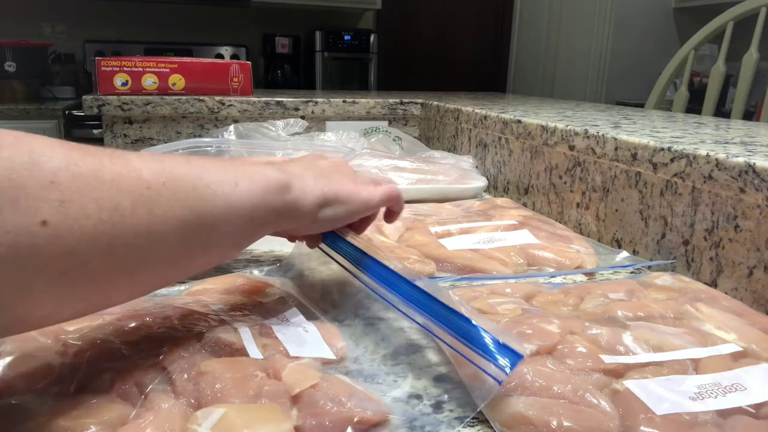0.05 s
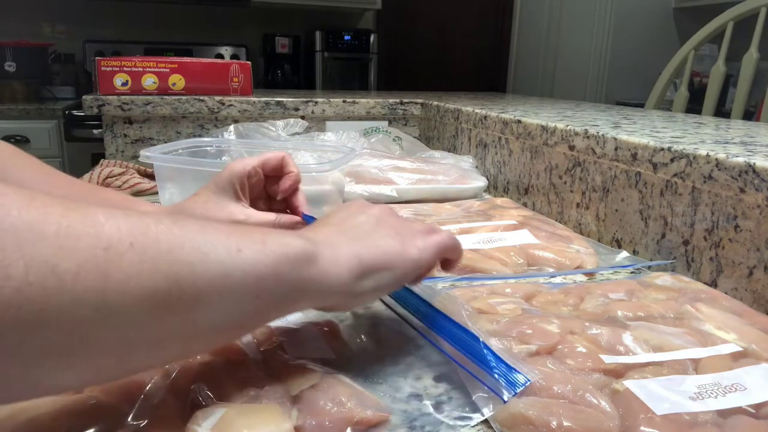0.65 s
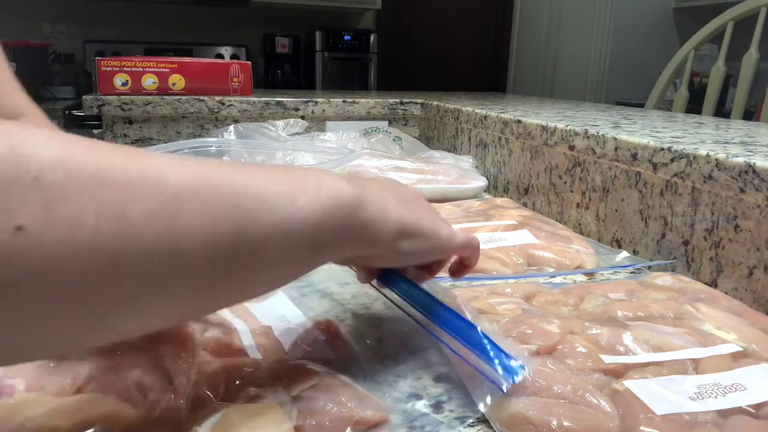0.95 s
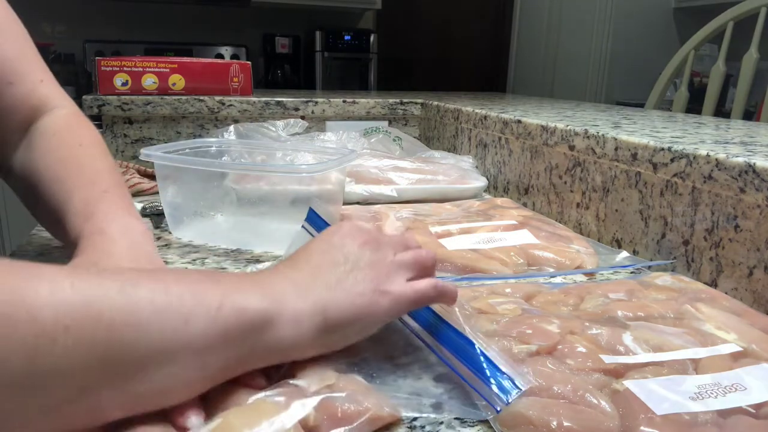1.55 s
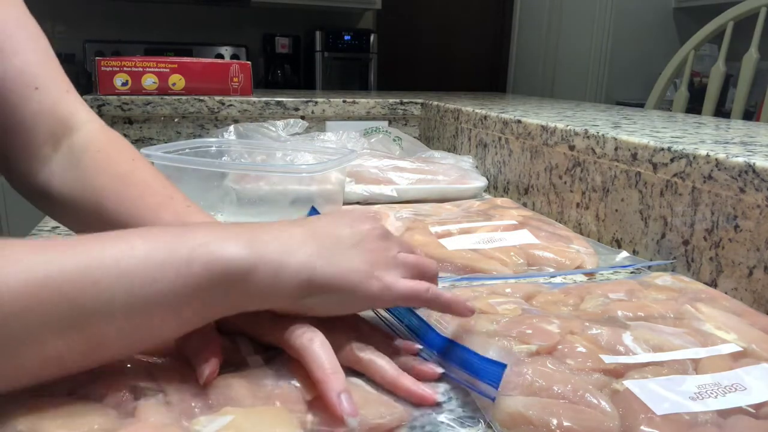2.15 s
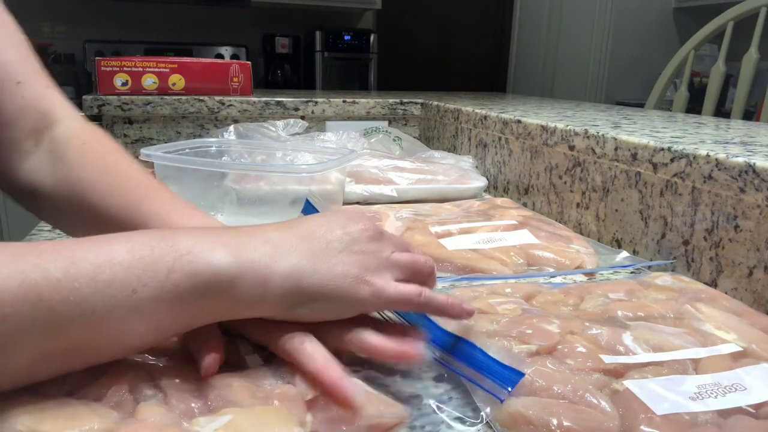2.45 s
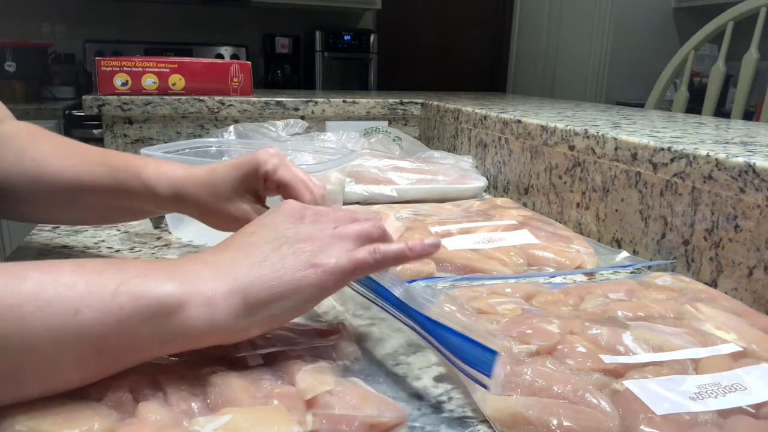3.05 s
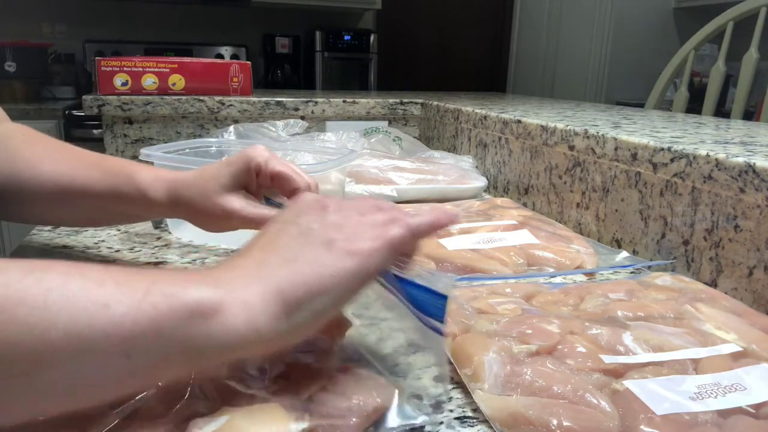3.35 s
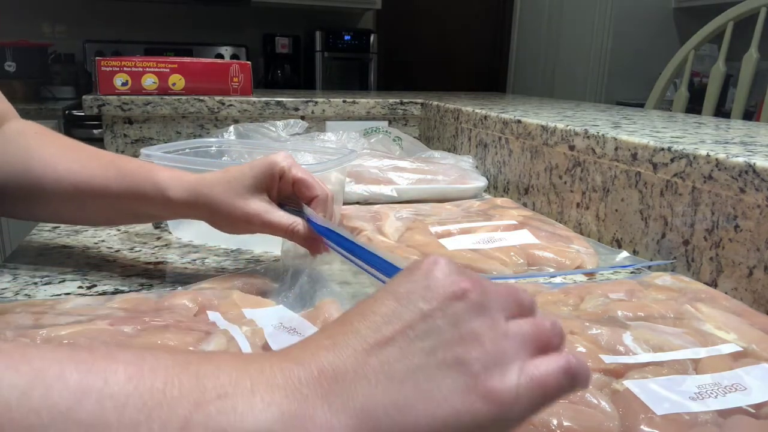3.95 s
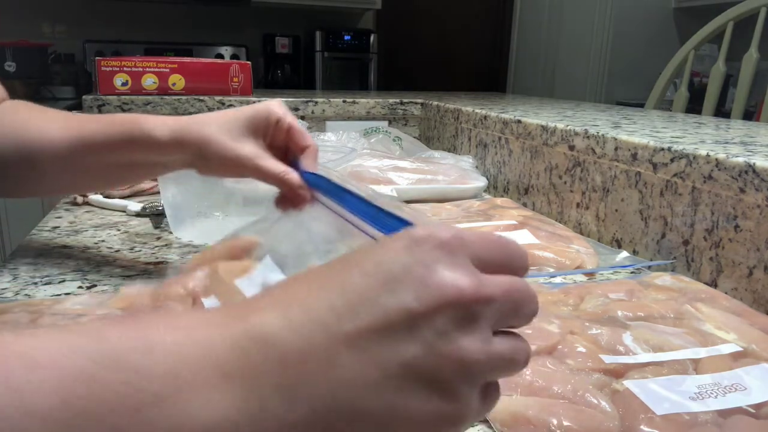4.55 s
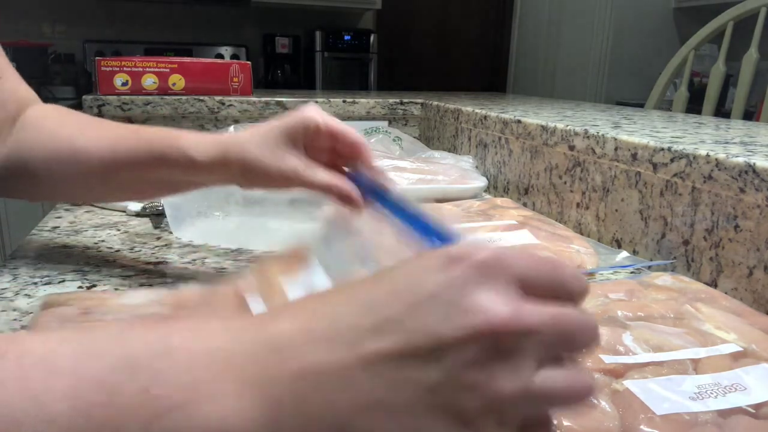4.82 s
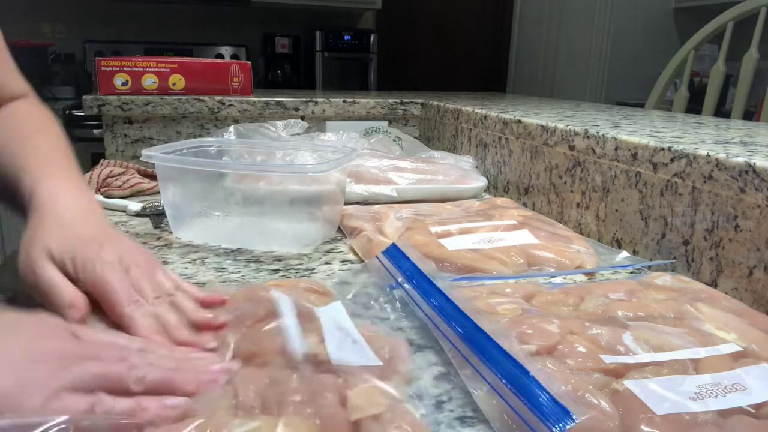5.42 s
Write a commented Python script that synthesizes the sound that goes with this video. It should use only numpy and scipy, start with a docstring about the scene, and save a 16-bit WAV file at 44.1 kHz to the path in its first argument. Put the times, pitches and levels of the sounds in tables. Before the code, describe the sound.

A plastic freezer bag of raw meat softly crinkles and crackles as it is pressed, sealed and laid down on a kitchen counter.

```python
"""Faint snaps, a fine crinkle and a hiss: a plastic freezer bag of raw chicken is pressed flat and sealed,
then lifted and laid down on a stone kitchen counter. Creases buckle and ring small patches of film,
and fingers make friction noise along the zip strip. A hand bumps an empty plastic tub, whose walls ring.
The meat shifts and flops softly, and an appliance hums in the small, reverberant room."""
import sys
import numpy as np
from scipy import signal
from scipy.fft import rfft, irfft, next_fast_len
from scipy.io import wavfile
from scipy.ndimage import uniform_filter1d, map_coordinates

SR = 44100
rng = np.random.default_rng(int(sys.argv[2]) if len(sys.argv) > 2 else 0)


def master(y):
    """Save y as 16-bit WAV."""
    cut = np.clip(np.atleast_2d(y).T, -1, 1)
    pcm = np.round(cut * 32767)  # scale
    wavfile.write(sys.argv[1], SR, pcm.astype(np.int16))


N = 250488
CREAK_S, CLICK_S = .003, .005  # creak ahead of a snap; nominal length of a click


def snaps():
    """Snap-through buckling: each large crease rings a patch of film; taut ones add a brief sharp edge."""
    # Each row: time in seconds, relative level in dB, patch pitch in Hz, relative edge strength in dB.
    creases = [(.083, -58.5, 2380, -21), (.165, -62, 1400, -24.5), (0.2672, -54.5, 4200, -19),
               (.29, -50.5, 5360, -6), (0.311, -58, 5060, -13), (0.499, -55.5, 2300, -24),
               (0.5351, -44, 3920, -5), (.6492, -60, 1990, -19), (0.754, -37.5, 2620, -16),
               (0.8938, -42.5, 1340, -33), (1.0152, -32, 3040, -9.5), (1.0232, -39, 3360, -14),
               (1.0607, -41, 2380, -9), (1.1983, -45.5, 3600, -31), (1.2221, -34.5, 1244, -7.5),
               (1.2245, -40, 3650, -24), (1.2853, -53, 3810, 2), (1.31, -49, 1487, -30),
               (1.3402, -35.5, 2670, -7.5), (1.3962, -41, 3130, -26), (1.4365, -44, 3920, -24),
               (1.4625, -42, 3325, -11), (1.4696, -41, 1977, 5), (1.4905, -39.5, 3070, -16),
               (1.5332, -48, 1960, -23), (1.5573, -49, 4020, -10), (1.597, -41, 4340, -17),
               (1.6076, -38, 6750, 4.5), (1.613, -40.5, 3765, -12), (1.6321, -42, 2240, -23),
               (1.6559, -45.5, 2300, 1), (1.7012, -43.5, 2340, -4), (1.838, -42, 1439, -27),
               (1.8649, -45.5, 1588, -20), (1.9271, -44, 2350, 2), (1.939, -41, 1270, -14),
               (1.9762, -45, 1750, -25), (1.9874, -40, 3040, -23), (2.018, -44, 3940, -8),
               (2.0311, -36.5, 1720, -8), (2.0491, -41.5, 2640, -8), (2.1387, -40, 1490, -14),
               (2.192, -45.5, 1390, -5), (2.2512, -46, 1180, -31), (2.355, -39, 3470, -18),
               (2.3692, -41.5, 3212, -21), (2.4084, -40.5, 1806, -2.5), (2.42, -45, 2283, -21),
               (2.5854, -54.5, 3120, -29), (2.6521, -48.5, 3754, -11), (2.7301, -42.5, 1832, -10),
               (2.8528, -42.5, 5240, -6), (2.8664, -39, 3900, -10), (2.873, -52, 2327, -26),
               (2.909, -46, 5960, -9), (3.068, -54, 3440, -24), (3.1473, -40.5, 5260, -1.5),
               (3.1905, -46.5, 3580, -29), (3.2487, -47.5, 2520, -19), (3.303, -47.5, 3056, -20),
               (3.3155, -48, 3830, -4), (3.327, -47, 2860, -18), (3.495, -49, 1580, -17),
               (3.615, -52, 2990, -25), (3.692, -48, 1720, -31), (3.8235, -43.5, 6960, 3),
               (3.9244, -45.5, 5650, 7.5), (3.9958, -51, 1448, -30), (4.0415, -39.5, 2617, 2.5),
               (4.1202, -46, 2380, -24), (4.1932, -46, 1436, -19), (4.2201, -44, 3810, -24),
               (4.2715, -49.5, 3000, -27), (4.336, -45.5, 1873, -20), (4.3765, -43.5, 3430, -15),
               (4.396, -42.5, 1792, -26), (4.4018, -45, 2390, -4), (4.4193, -41.5, 1905, 1),
               (4.4518, -43.5, 4300, 3.5), (4.4875, -41, 1500, -11), (4.534, -37.5, 3230, -3),
               (4.605, -47, 4364, -26), (4.6353, -45.5, 3996, -16), (4.7428, -40.5, 3240, -24),
               (4.7673, -51.5, 1709, 6), (4.8315, -45.5, 3128, -7), (4.8592, -34.5, 2980, -13),
               (4.8687, -39, 2357, -19), (4.872, -39.5, 1900, -16), (4.8834, -29, 4170, -12.5),
               (4.9716, -35, 2430, -11.5), (4.9766, -41.5, 2260, -26), (5.0988, -46, 2200, -27),
               (5.1644, -41, 1820, -30), (5.212, -42, 2500, 2), (5.2329, -39.5, 3614, -10),
               (5.2527, -36.5, 5220, -4.5), (5.2672, -37, 5650, -3), (5.297, -39, 4110, -17),
               (5.3132, -36, 2291, 0), (5.3557, -35.5, 4400, -1), (5.3987, -40, 3866, -25),
               (5.4145, -32.5, 5860, -27), (5.4297, -32, 4340, -6), (5.444, -34, 3170, -23),
               (5.469, -29, 1613, -2.5), (5.5208, -37.5, 2880, -15)]
    times, db, hz, edge_db = np.transpose(creases)
    force = buckling(len(times), crack_t60=0.0032, flutter_t60=0.019, flutter_db=1, lead_db=-23, jolt=4.1)
    patch = filtered(force, lambda f: film(f, hz[:, None], q=1.21, body_hz=1850, body_q=0.057, dull_hz=7270))
    crack = buckling(len(times), crack_t60=0.0037, flutter_t60=0.014, flutter_db=-6, lead_db=-28, jolt=1.9)
    edge = filtered(crack, lambda f: resonance(f, 10300, q=1.0) ** 2)
    clicks = levelled(patch) + amp(edge_db - 6.5)[:, None] * levelled(edge)
    return placed(times - CREAK_S, amp(db + 1.3)[:, None] * clicks)


def crinkle(level_db, pitch_hz, count=1500, spread=0.52, range_db=19, crowding=.7):
    """Crackling noise: tiny random creases give way, more densely the harder the film is worked."""
    density = amp(crowding * level_db)
    density /= density.mean()
    at = np.searchsorted(np.cumsum(density), (np.arange(count) + rng.random(count)) * (N - 1) / count)
    hz = (pitch_hz[at] * np.exp(spread * rng.standard_normal(count)))[:, None]
    force = buckling(count, crack_t60=.005, flutter_t60=.02, flutter_db=-10, lead_db=-13, jolt=3)
    ticks = filtered(force, lambda f: film(f, hz, q=1.02, body_hz=2300, body_q=0.33, dull_hz=2.08 * hz))
    # Ticks that sound together add in power, so they share the level.
    overlap = density[at] * count * CLICK_S * SR / N
    sizes = unit(amp(range_db * rng.random(count) ** 2)) * amp(level_db[at] - 3.0) / np.sqrt(overlap)
    return placed(at / SR, sizes[:, None] * levelled(ticks))


def buckling(count, crack_t60, flutter_t60, flutter_db, lead_db, jolt):
    """Elastic instability: the force of a flipping crease is a creak, a jolt and crack, then flutter."""
    t = np.arange(SR // 50) / SR - CREAK_S
    crack = (t >= 0) * amp(-60 * np.abs(t) / crack_t60)
    flutter = amp(flutter_db - 60 * np.abs(t) / flutter_t60) * np.where(t < 0, amp(lead_db), 1)
    stutter = amp(4 * unit(uniform_filter1d(rng.standard_normal((count, len(t))), size=40, axis=1)))
    force = rng.standard_normal((count, len(t))) * (crack + flutter * stutter)
    force[:, np.argmax(t >= 0) + 2] += jolt * rng.choice([-1, 1], count)
    return force


def film(f, hz, q, body_hz, body_q, dull_hz):
    """Resonators in series: a patch's own pitch on the whole bag's broad response, dulled at the top."""
    return resonance(f, hz, q) * resonance(f, body_hz, body_q) / np.sqrt(1 + (f / dull_hz) ** 8)


def handling():
    """Relaxation: film gives at once, settles slowly. The strongest grip sets levels and crease pitch."""
    # The hands press, lift or lay down the bag. Each row: start in seconds, hold in seconds,
    # relative crinkle level in dB, relative meat level in dB, typical crease pitch in Hz.
    grips = [(0.254, .36, -68, -78, 2310), (0.759, .15, -51, -60, 1840), (1.005, .02, -42, -54, 2400),
             (1.237, .02, -46, -60, 2275), (1.379, .12, -49, -57.5, 2080), (1.619, .07, -50, -62, 1930),
             (1.841, .06, -55, -58.5, 1707), (1.937, .11, -47, -59, 1839), (2.16, .09, -59, -73, 1750),
             (2.374, .09, -49, -66, 2130), (2.603, .15, -62, -70, 2100), (2.873, .02, -53, -62.5, 2308),
             (3.09, .01, -62, -59, 2510), (3.16, .11, -56, -59, 2020), (3.522, .2, -61, -67.5, 2070),
             (4.126, .09, -53, -56, 1950), (4.389, .15, -49, -54, 1997), (4.629, .16, -51, -61, 2197),
             (4.852, .03, -37, -48.5, 2280), (4.953, .08, -50, -61, 2140), (5.147, .26, -44, -58.5, 2325),
             (5.45, .025, -32, -50, 2900)]
    start, hold, crinkle_db, meat_db, hz = np.transpose(grips)
    levels = gestures(start, hold, crinkle_db, rise=649.5, sag=0, fall=170)
    strongest, film_db = levels.argmax(axis=0), levels.max(axis=0)
    shifting_db = film_db + (meat_db - crinkle_db)[strongest]
    # The floors belong to a hand that only holds the bag.
    return np.maximum(film_db, -73), np.maximum(shifting_db, -75), hz[strongest]


def slide(crinkle_db, rub_db=-13, tilt_db_per_octave=3):
    """Stick-slip friction: a finely rasping hiss, brighter for a fingertip than for film on film."""
    # Fingers run along zip strip and film. Each row: start and length in seconds, relative level in dB.
    strokes = [(0, .02, -57), (0.246, 0.395, -59), (0.765, 0.07, -56.5), (1.873, .15, -51.5),
               (2.378, .2, -55.5), (3.363, 0.52, -51), (4.05, .15, -63), (4.68, .3, -55.5),
               (5.18, .2, -50.5)]
    # Friction spectrum. Each row: frequency in Hz, relative spectral density in dB.
    hiss = [(1000, -26), (2200, -0.5), (3500, 3.5), (7500, -0.5), (9000, -7), (13000, -6.5), (16000, -13)]
    # The finger speeds up, slows and lets go.
    stroke_db = gestures(*np.transpose(strokes), rise=174, sag=22.5, fall=310).max(axis=0)
    brighter = [(hz, db + tilt_db_per_octave * np.log2(hz)) for hz, db in hiss]
    rasp = unit(amp(1.5 * wobble(58) + 2.0 * wobble(1000)))
    fingertip = amp(stroke_db) * noise(brighter)
    film_on_film = amp(crinkle_db + rub_db) * noise(hiss)
    return amp(-7.5) * rasp * (fingertip + film_on_film)


def tub(contacts=3, chatter_s=0.00452, loss_db=5.5):
    """Modal ringing: the tub's rim rebounds after a bump; each contact rings the walls at new strengths."""
    # The tub knocks on the counter. Each row: time in seconds, relative peak level in dB.
    bumps = [(.749, -24), (.774, -34), (.805, -38), (.841, -31), (.854, -29), (.895, -31), (.92, -39),
             (0.942, -37)]
    # Each row: frequency in Hz, relative level in dB, time to decay by 60 dB in seconds.
    wall_modes = [(204.7, -4, 0.092), (266, 0.5, 0.027), (331, -4.5, 0.097), (429, 5.5, 0.028),
                  (600, -4.5, 0.05), (785, -7, 0.16), (896, -4, 0.044), (1320, -8.5, 0.055)]
    t = np.arange(SR // 4) / SR
    touches = [(at + k * chatter_s, peak_db - k * loss_db) for at, peak_db in bumps for k in range(contacts)]
    times, db = np.transpose(touches)
    modes = np.array([amp(level - 60 * t / t60) * np.sin(2 * np.pi * hz * t) for hz, level, t60 in wall_modes])
    shape = (len(times), len(wall_modes))
    strengths = amp(rng.normal(0, 1.4, shape)) * rng.choice([-1, 1], shape)
    dull = lambda f: resonance(f, 275, q=0.99) * resonance(f, 395, q=0.52) * resonance(f, 843, q=0.63)
    scuff = filtered(rng.standard_normal((len(times), len(t))) * amp(-60 * t / 0.073), dull)
    rings = (strengths @ modes + amp(20.5) * scuff) * (1 - np.exp(-t / .001))
    rings = filtered(rings, lambda f: resonance(f, 400, q=.2))  # thin walls radiate little deep bass
    return placed(times, rings * amp(db - .5)[:, None] / np.abs(rings).max(axis=1, keepdims=True))


def meat(level_db):
    """Heavily damped impacts: wet meat shifts in lumps, pats the film and flops under its own weight."""
    # Each row: frequency in Hz, relative spectral density in dB.
    shifting_spectrum = [(60, -13), (140, -7.5), (210, -1.5), (450, 5.5), (800, -4.5), (1250, 3.5),
                         (2600, -35)]
    # Each row: time in seconds, relative peak level in dB.
    soft_pats = [(1.984, -50), (2.139, -48.5), (2.651, -50.5), (2.732, -47), (3.44, -49.5), (4.127, -51),
                 (4.192, -41.5), (4.882, -44), (4.952, -46.5)]
    # The full bag meets the counter. Each row: time in seconds, relative level in dB.
    flops = [(1.025, -48), (4.89, -56)]
    lumps = amp(11 * np.tanh(wobble(110)))
    shifting = amp(level_db + 3.0) * unit(noise(shifting_spectrum) * lumps)
    t = np.arange(SR // 4) / SR
    pat_times, pat_db = np.transpose(soft_pats)
    bursts = rng.standard_normal((len(pat_times), len(t))) * amp(-60 * t / 0.087)
    pats = filtered(bursts, lambda f: resonance(f, 350, q=0.61) ** 2)
    pats *= amp(pat_db + 5.0)[:, None] / np.abs(pats).max(axis=1, keepdims=True)
    flop_times, flop_db = np.transpose(flops)
    thud = np.sin(2 * np.pi * 52 * t) * amp(-60 * t / 0.15) * (1 - np.exp(-t / 0.0095))
    return shifting + placed(pat_times, pats) + placed(flop_times, amp(flop_db)[:, None] * thud)


def kitchen(x, positions=24):
    """Diffuse reverberation: the bass lingers longest, and the echoes change as the bag moves."""
    # Each row: frequency in Hz, time to decay by 60 dB in seconds.
    reverberation_times = [(150, 0.93), (1000, 0.27), (4000, 0.46), (14000, 0.21)]
    hz, t, spectra = signal.stft(rng.standard_normal((positions, SR // 2)), SR, nperseg=256)
    decay = amp(-60 * t / along(reverberation_times, hz)[:, None])
    tails = signal.istft(spectra * decay, SR, nperseg=256)[1]
    tails *= 1 - np.exp(-np.arange(tails.shape[1]) / SR / 0.0012)
    tails /= np.linalg.norm(tails, axis=1, keepdims=True)
    step = N // positions + 1
    pieces = np.pad(x, (0, step * positions - N)).reshape(positions, step)
    return placed(np.arange(positions) * step / SR, signal.fftconvolve(pieces, tails, axes=1))


def background():
    """A line spectrum over broadband noise: an appliance hums with wandering phase in still room air."""
    # Each row: frequency in Hz, rms level in dB.
    hum_tones = [(119.5, -72), (201, -71), (318, -74)]
    # Each row: frequency in Hz, relative spectral density in dB.
    air_spectrum = [(25, -42), (50, -14), (100, -5), (200, 4), (400, -3.5), (800, -8), (2000, -17.5),
                    (6000, -24.5), (9000, -30), (16000, -37)]
    t = np.arange(N) / SR
    hum = sum(amp(db) * np.sqrt(2) * np.sin(2 * np.pi * hz * t + hz / 300 * wobble(9))
              for hz, db in hum_tones)
    return hum + amp(-64.5) * noise(air_spectrum)


def gestures(start, hold, db, rise, sag, fall):
    """Exponential envelopes in dB, one row a movement: rise, sag while held, fall, all in dB per second."""
    t = np.arange(N) / SR - start[:, None]
    held = np.clip(t, 0, hold[:, None])
    return db[:, None] + rise * np.minimum(t, 0) - sag * held - fall * np.maximum(t - held, 0)


def resonance(f, hz, q):
    """Causal band-pass response of a damped oscillator."""
    return 1j * f * hz / q / (hz * hz - f * f + 1j * f * hz / q)


def filtered(x, response):
    """Linear filtering: the spectrum of each row times a frequency response."""
    n = x.shape[-1]
    padded = next_fast_len(n + n // 2)
    return irfft(rfft(x, padded) * response(np.fft.rfftfreq(padded, 1 / SR)), padded)[..., :n]


def noise(spectrum):
    """Spectral shaping: coloured noise of rms 1."""
    return unit(filtered(rng.standard_normal(N), lambda f: amp(along(spectrum, f))))


def wobble(rate):
    """Smooth random modulation, with rate knots a second."""
    return map_coordinates(rng.standard_normal(int(N * rate / SR) + 4), [np.arange(N) * rate / SR])


def placed(times, sounds):
    """Superposition of short sounds, one a row, at their times in seconds."""
    at = np.round(np.abs(times) * SR).astype(int)[:, None] + np.arange(sounds.shape[1])
    return np.bincount(at.ravel(), sounds.ravel(), N)[:N]


def levelled(clicks):
    """Equal energy: each row carries that of CLICK_S seconds at rms 1."""
    return clicks / np.sqrt(np.sum(clicks ** 2, axis=1, keepdims=True) / (SR * CLICK_S))


def along(points, hz):
    """Interpolation of (Hz, value) points on a logarithmic frequency axis."""
    frequencies, values = np.transpose(points)
    return np.interp(np.log(hz + 1), np.log(frequencies + 1), values)


def amp(db):
    """Decibels as an amplitude ratio."""
    return 10 ** (np.asarray(db) / 20)


def unit(x):
    """Normalisation to rms 1."""
    return x / np.sqrt(np.mean(x ** 2) + 1e-20)


def scene():
    """Direct and diffuse fields add: bag and tub close by, the room behind them."""
    crinkle_db, meat_db, pitch_hz = handling()
    direct = snaps() + crinkle(crinkle_db, pitch_hz) + slide(crinkle_db) + meat(meat_db) + tub()
    return (direct + amp(-14) * kitchen(direct) + background())[None]


def record(dry):
    """Band limiting: the small microphone sheds deep bass, and nothing above 16 kHz is kept."""
    thinned = signal.sosfilt(signal.butter(4, 42, "highpass", fs=SR, output="sos"), dry)
    return filtered(thinned, lambda f: f < 16000)


dry = scene()
out = record(dry)
master(out)
```